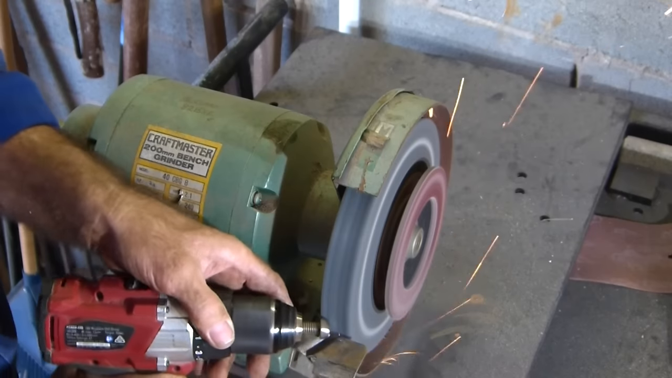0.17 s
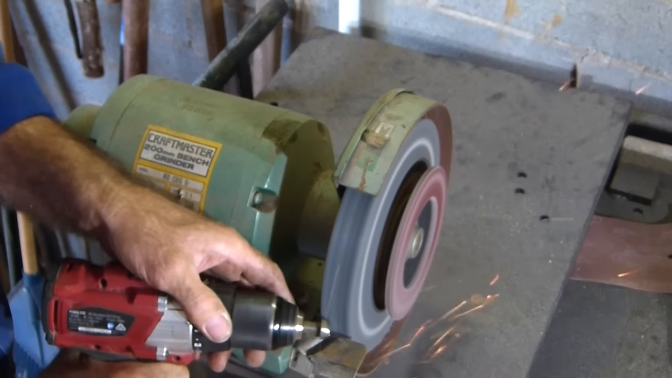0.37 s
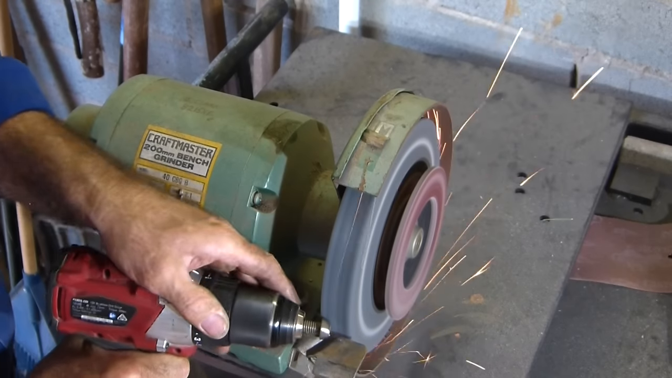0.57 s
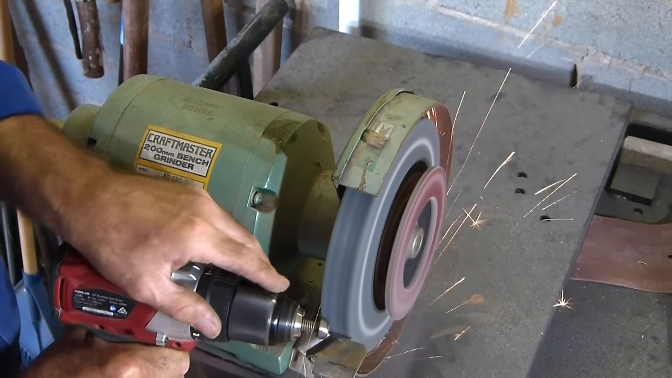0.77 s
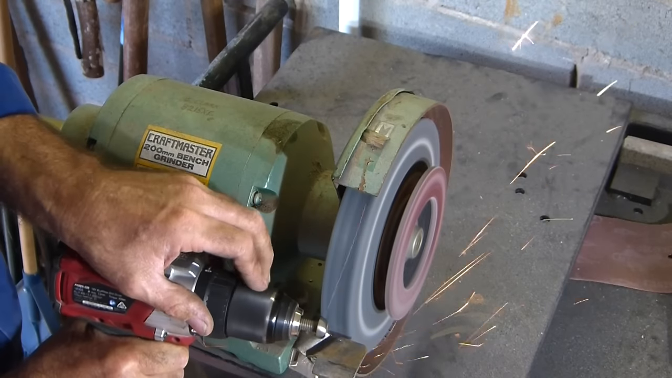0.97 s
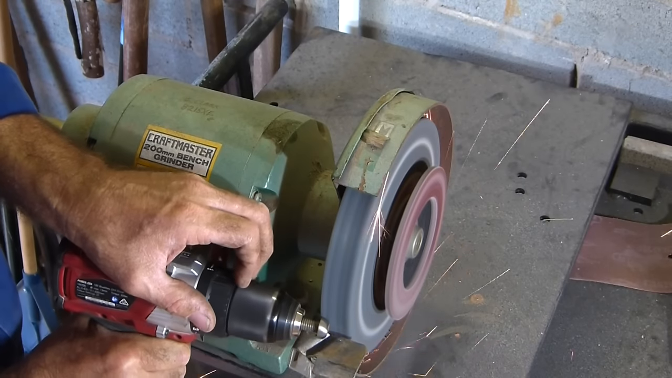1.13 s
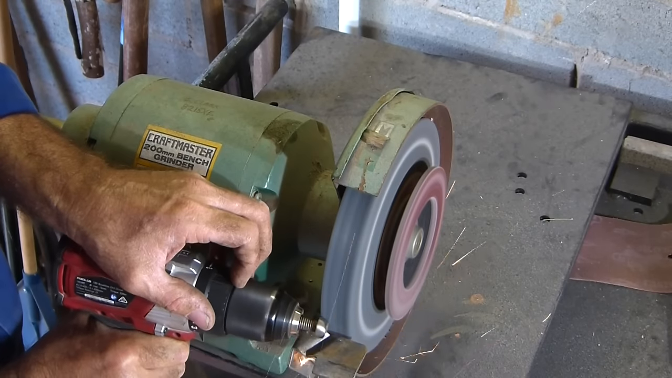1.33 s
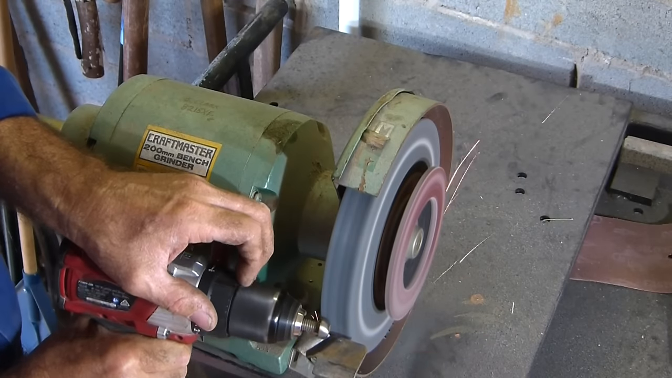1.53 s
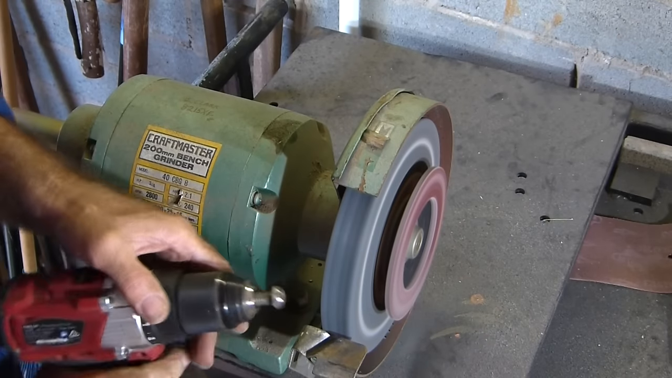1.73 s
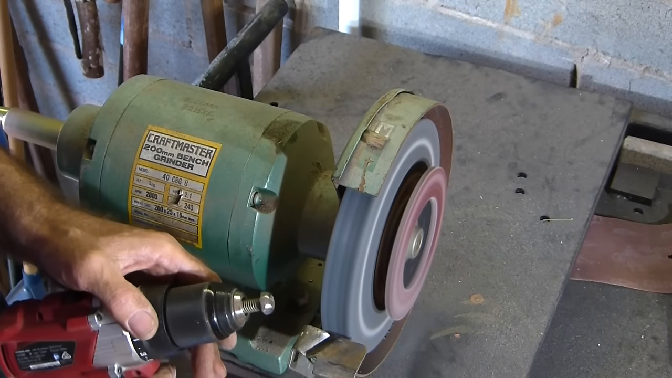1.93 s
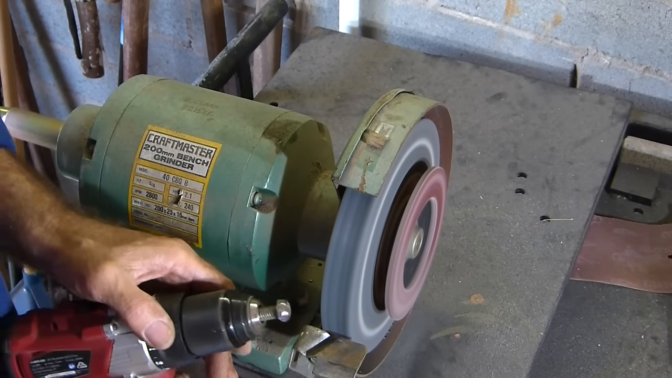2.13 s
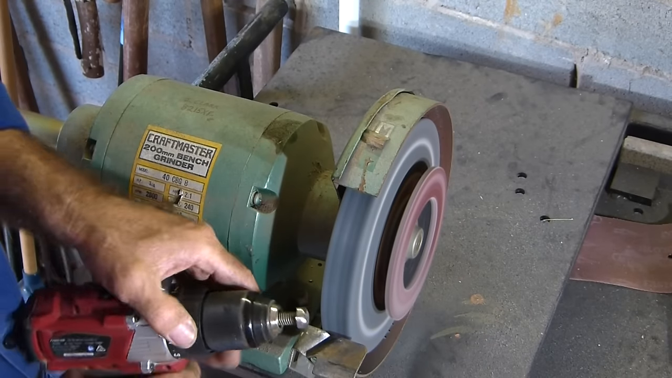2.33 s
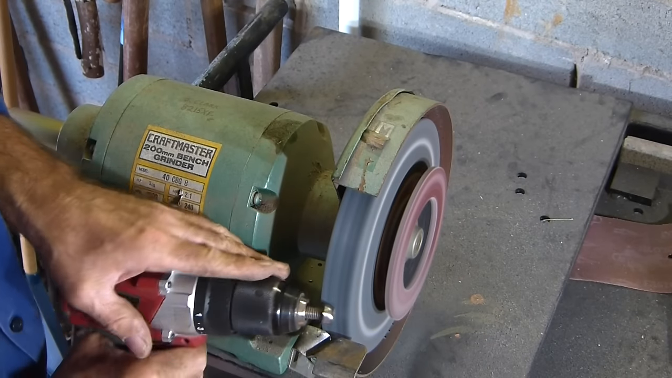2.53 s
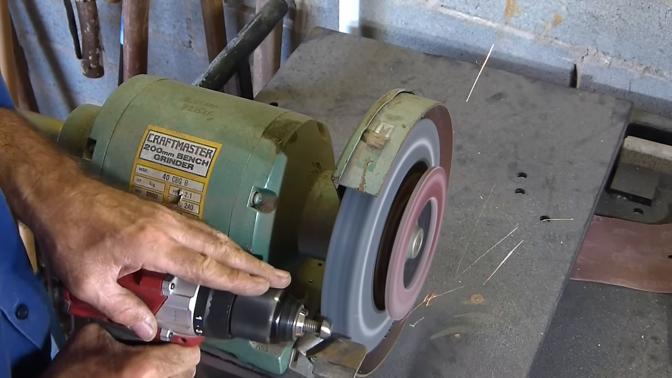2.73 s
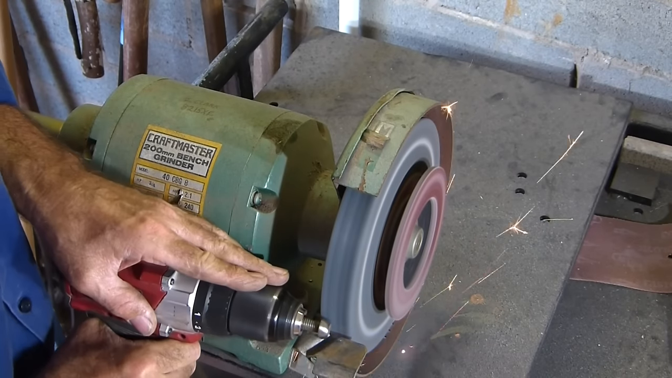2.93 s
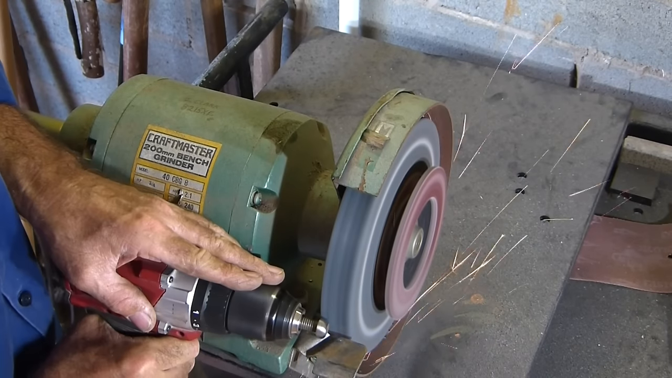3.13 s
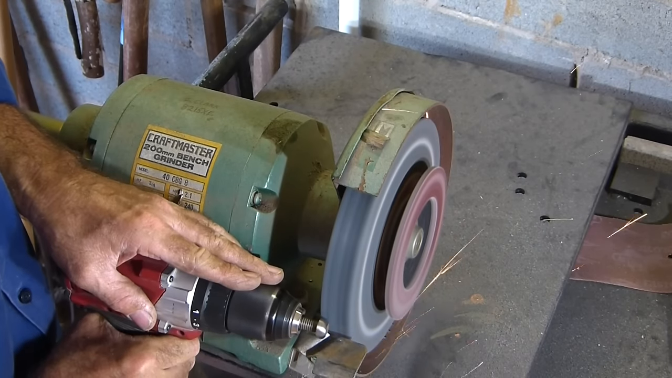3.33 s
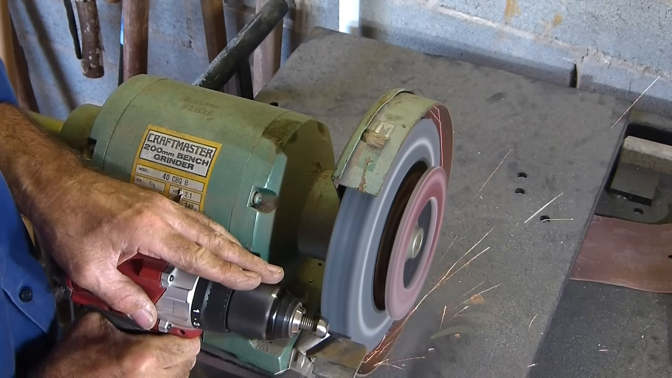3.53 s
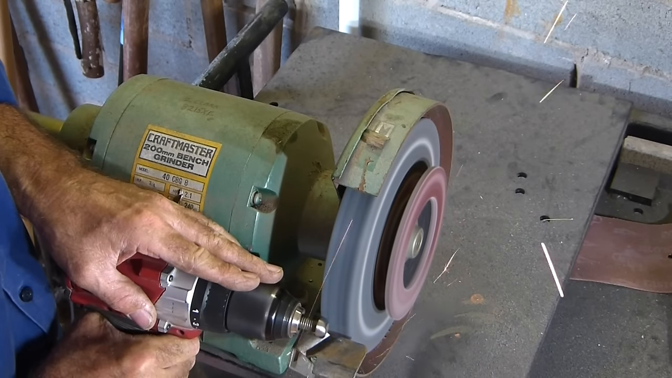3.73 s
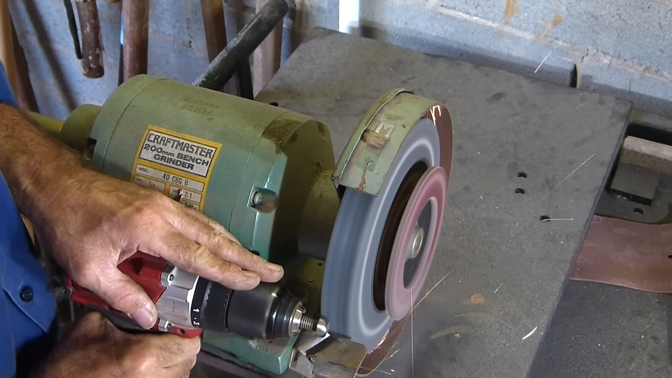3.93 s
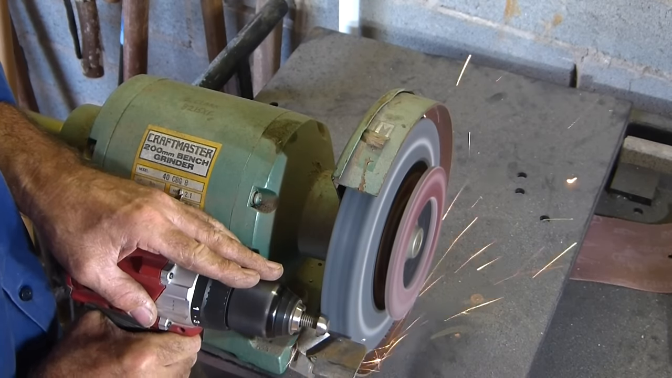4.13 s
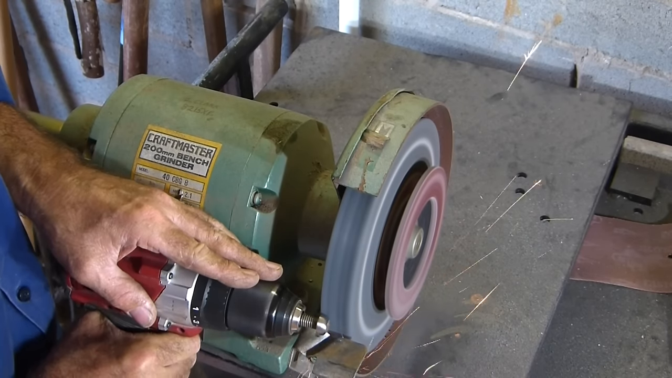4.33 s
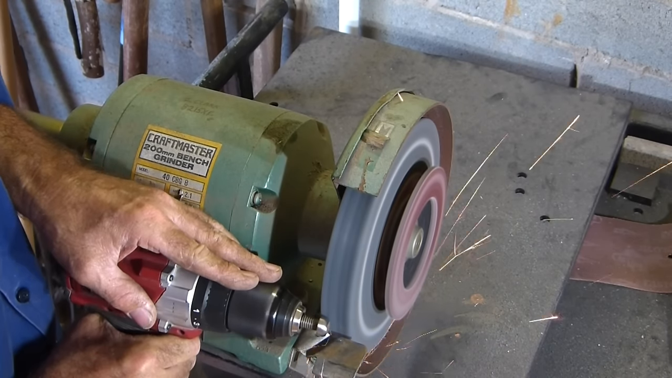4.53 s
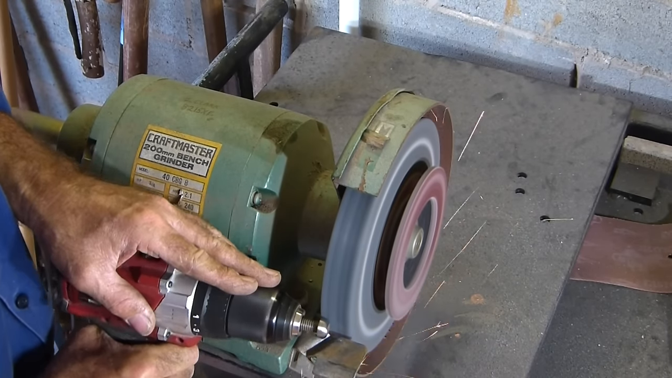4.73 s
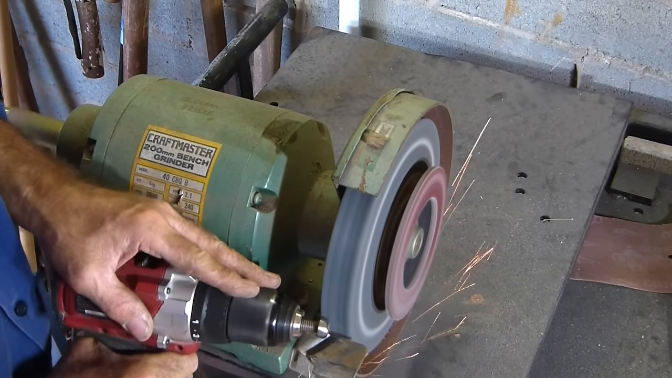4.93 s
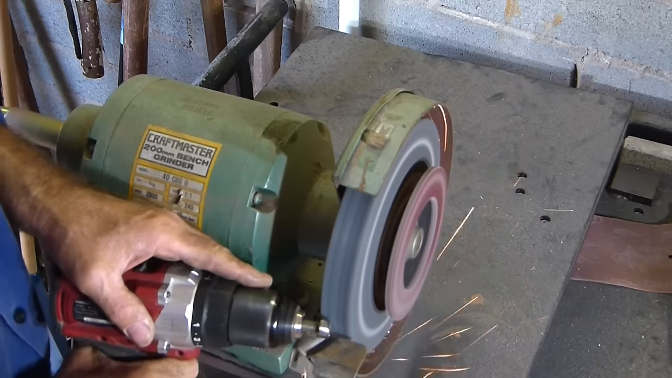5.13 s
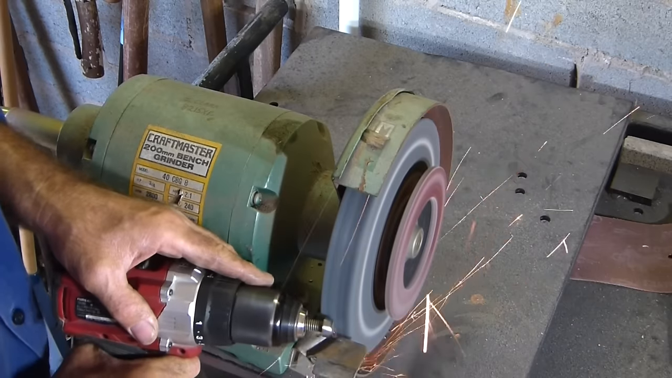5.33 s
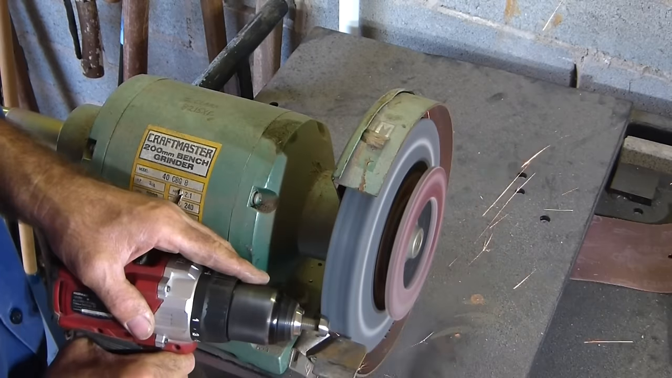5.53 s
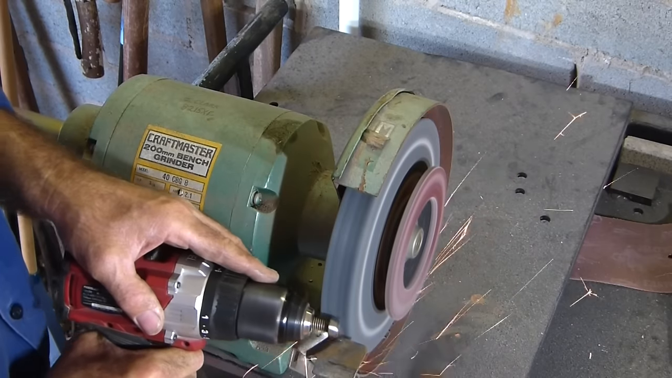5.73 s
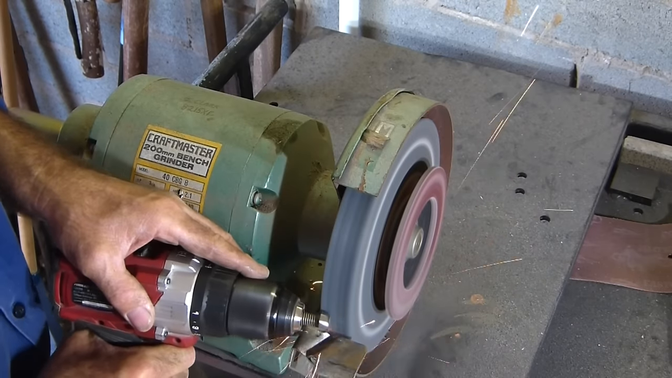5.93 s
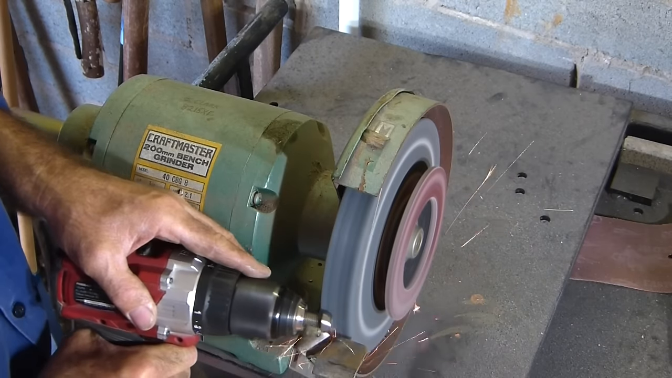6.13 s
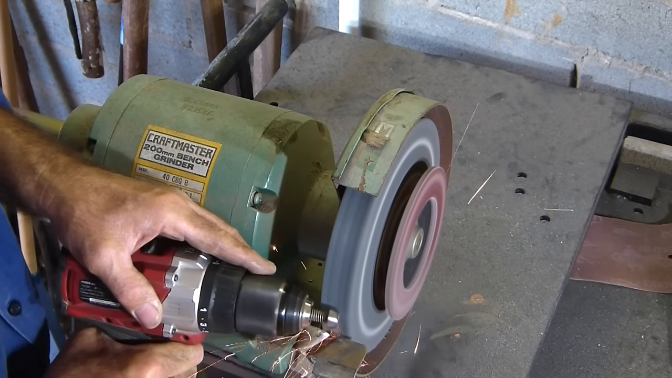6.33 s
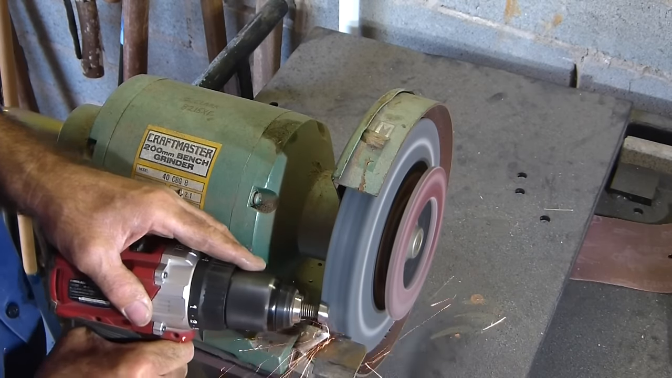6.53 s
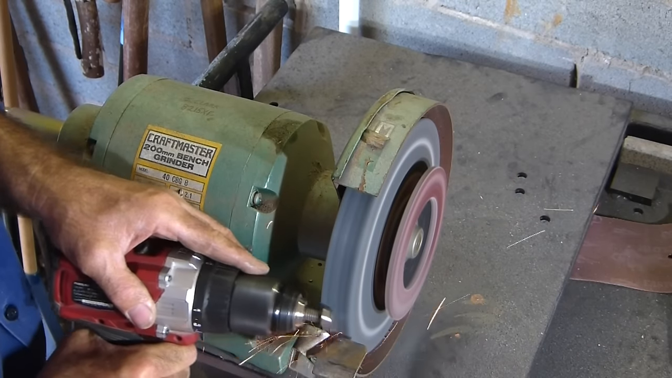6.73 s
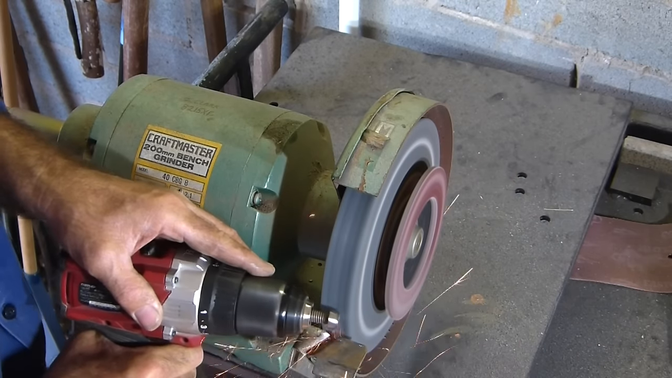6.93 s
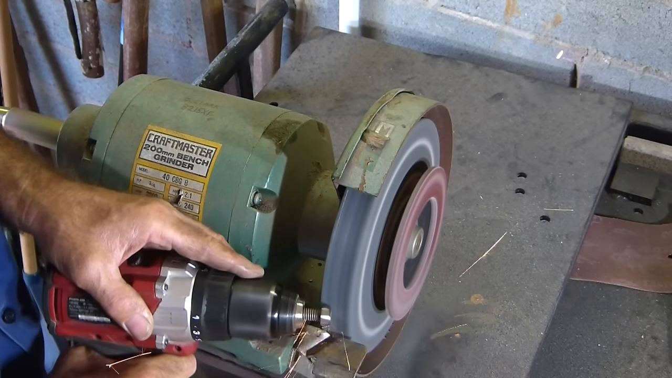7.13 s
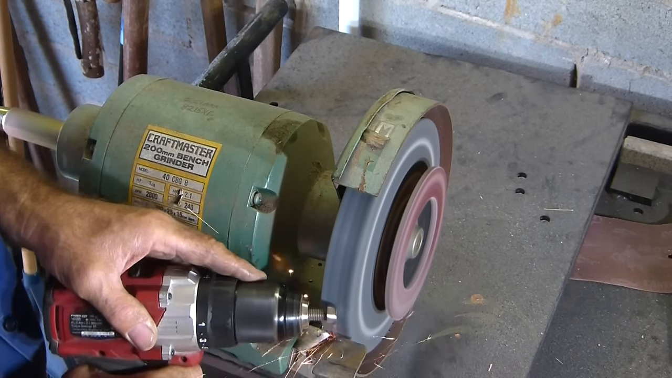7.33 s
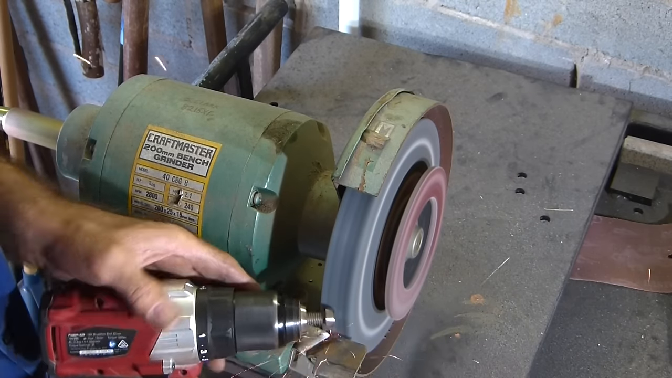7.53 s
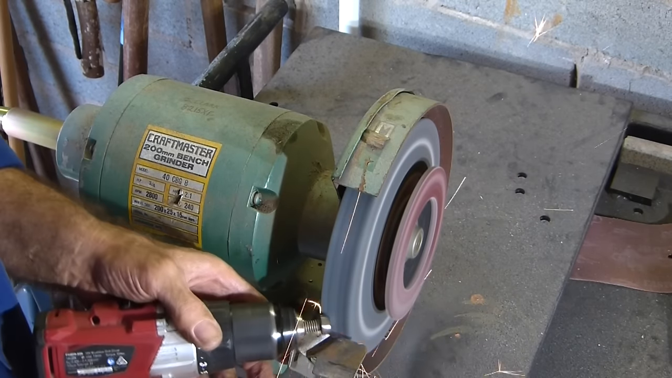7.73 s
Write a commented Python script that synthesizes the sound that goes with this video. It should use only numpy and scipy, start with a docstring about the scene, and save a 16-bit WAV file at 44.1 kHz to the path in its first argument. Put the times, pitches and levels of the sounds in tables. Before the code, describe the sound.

A bench grinder runs close by in a workshop, its motor giving a steady low rumble and hum throughout. From the start, a steel bolt spun in a cordless drill grinds on the wheel: a bright, gritty, fluttering hiss with very high metallic ringing, a light rattle and irregular sharp ticks. The drill's thin gear whine sits within it. At about 1.6 seconds the trigger clicks softly, the drill stops and the bolt lifts off, leaving only the motor and the airy whirr of the free wheel. Around 2.5 seconds comes a sharper click, then the drill's whine rises quickly to speed and the grinding resumes by 2.7 seconds. It continues evenly to the end, near 8 seconds, with ringing tones swelling and fading and scattered ticks and small pings as the steel catches the grit.

```python
"""Workshop: a steel bolt, spun in a cordless drill, is ground on a bench grinder, lifted off for a
second and put back. The grinder motor rumbles and hums throughout; the free wheel fans the air.
The trigger clicks, and the drill's gears whine while it is held. The grit hisses and sets bolt,
wheel and housing ringing; the six flats of the bolt make the contact flutter."""
import sys
import numpy as np
from scipy import signal
from scipy.fft import rfft, irfft, next_fast_len
from scipy.io import wavfile
from scipy.ndimage import uniform_filter1d

SR = 44100
rng = np.random.default_rng(int(sys.argv[2]) if len(sys.argv) > 2 else 0)


def dump(signal):
    """Clip the signal to [-1, 1] and save it as 16-bit WAV at the path in sys.argv[1]."""
    limited = np.clip(np.atleast_2d(signal).T, -1, 1)
    pcm = np.round(limited * 32767).astype(np.int16)
    wavfile.write(sys.argv[1], SR, pcm)


N = 347067
TIME_S = np.arange(N) / SR

WHEEL_HZ, FLATS_HZ, GEAR_MESH_HZ = 50.3, 124, 2619
HUM_HZ, DRONE_HZ = 99.5, 182
FULL_PRESSURE_HISS_DB = -43
SMALL_PINGS_FROM_S = 2.8

# Levels are relative; each source adds its own gain.
# stereo width of noise: f/Hz, side against mid/dB
STEREO_WIDTH = [(25, -23), (60, -29), (125, -51), (250, -42), (500, -21.5), (1000, -11), (2200, -19.5),
                (2700, -0.5), (4000, -15), (4800, -9.5), (7200, -4), (8000, -2), (9800, -5), (11000, 2),
                (12500, -1.5), (15000, -9)]

# grinder motor: t/s, rumble/dB, mains hum/dB, drone/dB
MOTOR_LEVELS = [(0.0, -54, -80, -69), (0.55, -50, -79, -55), (0.7, -50.5, -67, -56),
                (1.56, -47.5, -80, -55), (1.6, -54, -71, -55), (1.78, -55, -52, -60), (1.95, -58, -59, -65),
                (2.21, -55.5, -60, -65), (2.3, -57.5, -68, -57), (2.58, -49, -54.5, -46.5),
                (3.04, -48.5, -60.5, -61), (3.24, -47.5, -75, -57), (4.73, -49.5, -71, -51.5),
                (4.91, -48, -71, -58), (6.4, -51, -63, -53.5), (6.53, -52, -59, -51),
                (6.7, -49.5, -63, -58.5), (7.0, -51.5, -67, -61), (7.15, -47.5, -61, -50),
                (7.3, -50, -63, -61), (7.52, -50, -55, -56), (7.72, -52, -74, -63), (7.87, -53, -51, -54)]
# motor rumble: f/Hz, level/dB
RUMBLE_SPECTRUM = [(15, -62), (25, -27), (64, -46), (96, -10), (140, -12), (173, -8), (213, -11), (248, -3),
                   (310, -10.5), (366, 0), (517, -4), (591, -2.5), (900, -14.5), (1170, -43), (1980, -120)]
# motor casing: f/Hz, width/Hz, level/dB
CASING_MODES = [(299, 11, -68.5), (448, 59, -62), (501.5, 16, -64), (588.5, 25, -61.5), (1158, 44, -65),
                (1355, 74, -68)]
# air fanned by the free wheel: t/s, level/dB
AIR_LEVELS = [(1.6, -60), (1.646, -51), (1.682, -63), (2.15, -59), (2.526, -57), (2.574, -56), (2.66, -49)]
# fanned air: f/Hz, level/dB
AIR_SPECTRUM = [(440, -44), (750, -31), (931, -18), (1070, -5), (1150, -7), (1260, -5), (1350, -4.5),
                (1820, -10.5), (3810, -13.5), (4730, -16), (5720, -15), (8060, -21.5), (8810, -17),
                (14300, -26.5), (15600, -39)]
# bearing whirr: f/Hz, width/Hz, level against air/dB
BEARING_MODES = [(4650, 300, -12), (4900, 250, -15), (5400, 200, -20), (7190, 400, -17), (8750, 400, -16)]

# trigger clicks and first touches: t/s, level/dB
KNOCK_EVENTS = [(1.64, -26.5), (2.534, -15.5), (2.6014, -33), (2.6574, -22)]
# knock: f/Hz, level/dB
KNOCK_SPECTRUM = [(880, -52), (1500, -34), (3800, -6), (4310, -4), (5450, 1), (7520, -16), (9700, -4),
                  (15500, -28)]

# gears at full speed, one table a pass: t/s, level/dB
GEAR_LEVELS = [
    [(0.0, -78), (0.23, -51), (0.48, -48), (0.6, -49.5), (0.84, -67), (1.136, -65), (1.188, -55),
     (1.58, -47.5)],
    [(2.75, -43.5), (2.99, -47.5), (3.33, -51.5), (4.0, -48), (4.83, -51), (5.0, -56), (5.09, -66),
     (5.3, -50.5), (5.64, -56), (6.0, -51), (7.03, -48.5), (7.13, -44), (7.7, -47), (7.87, -59)],
]
# gears on trigger release: t/s, f/Hz, level/dB
GEAR_RUN_DOWN = [(1.626, 2547, -48.5), (1.66, 2550, -60)]
# gears on trigger pull: t/s, f/Hz, level/dB
GEAR_RUN_UP = [(2.645, 1754, -56), (2.656, 2054, -41), (2.669, 2307, -37), (2.682, 2459, -47),
               (2.703, 2577, -37.5), (2.72, 2600, -41)]
# thin whistle at drill start: t/s, f/Hz, level/dB
START_WHISTLE = [(2.605, 10350, -68), (2.62, 10650, -60), (2.64, 11000, -66)]
# gears taking up slack: t/s, f/Hz, level/dB
SLACK_SCRAPE = [(2.595, 2176, -58), (2.627, 2080, -44), (2.647, 2070, -48), (2.66, 2100, -37)]

# moves between four contact spots on the wheel: start/s, end/s
SPOT_MOVES = [(2.0, 2.1), (2.88, 3.04), (4.7, 5.04)]
# four clear wheel tones: f/Hz
CLEAR_TONES_HZ = [3355, 3528, 7283, 11391]
# one row a clear tone: width/Hz, pan/dB, left lead/rad, coherence/0-1
CLEAR_SHAPES = [(61.3, -2, -0.057, 0.83), (29.6, -4.5, -.12, 0.78), (26, -5.5, 1, 0.6),
                (22.5, 2.5, -0.64, 0.3)]
# one row a clear tone, one column a spot: resting level/dB
CLEAR_SPOT_DB = [(-49.5, -50, -44.5, -48.5), (-48.5, -50, -48, -50), (-48.5, -53, -46, -52),
                 (-55, -55, -45.5, -53)]
# contact catching a clear tone, one table a tone: t/s, level/dB
CLEAR_TONE_SWELLS = [
    [(1.2, -50), (1.312, -51), (1.432, -45), (1.57, -52), (2.56, -54), (3.0, -44), (3.1, -42), (3.29, -46),
     (3.65, -46), (4.09, -48), (4.59, -43), (5.62, -42), (5.75, -53), (6.17, -45), (6.57, -46), (6.65, -53),
     (7.14, -44.5), (7.48, -38), (7.66, -37), (7.75, -41)],
    [(0.2, -39), (0.486, -50), (0.85, -47), (1.17, -45), (1.504, -43), (3.29, -40.5), (3.39, -39),
     (3.65, -60), (3.92, -41), (4.07, -38), (4.17, -46), (4.29, -42), (4.46, -43), (4.65, -42), (4.92, -49),
     (5.57, -44), (5.93, -44), (6.05, -39.5), (6.86, -41), (7.54, -44), (7.66, -41)],
    [(0.0, -35.5), (0.2, -44), (0.742, -48), (1.098, -46), (1.57, -43), (2.57, -57), (2.83, -39),
     (2.97, -49), (3.1, -39), (3.28, -44), (3.37, -46), (3.61, -39), (3.7, -38), (3.9, -41), (4.07, -40),
     (4.17, -43), (4.28, -38.5), (4.55, -46), (4.92, -40), (5.07, -36.5), (5.62, -39), (6.25, -36.5),
     (6.57, -43), (6.86, -38), (7.14, -45), (7.67, -46)],
    [(0.742, -41), (0.902, -45), (1.0, -49), (1.208, -46), (1.32, -44), (1.59, -54), (1.64, -52),
     (2.83, -47), (2.99, -48), (3.1, -53), (3.26, -47), (3.32, -38), (3.51, -39), (3.8, -40), (4.07, -42),
     (4.17, -40), (4.49, -42), (4.69, -38), (4.92, -46), (5.63, -39)],
]
# six faint wheel tones: f/Hz
FAINT_TONES_HZ = [3929, 4250, 7003, 10754, 11771, 12050]
# one row a faint tone: width/Hz, pan/dB, left lead/rad, coherence/0-1
FAINT_SHAPES = [(30, .8, 1.2, 0.85), (45, -4, -2, 1), (32, 29, 3.5, 0.6), (95, -11, -0.6, .6),
                (40.6, -2, 1.6, 0.9), (330, -7, -0.5, 0.7)]
# one row a faint tone, one column a spot: resting level/dB
FAINT_SPOT_DB = [(-55.5, -61, -57, -50.5), (-54.5, -55, -59, -56.5), (-48, -49, -49.5, -57),
                 (-56, -59, -53, -63), (-48, -55, -42.5, -52.5), (-50, -43, -54, -47)]
# swells of the faint tones, one table a tone: t/s, level/dB
FAINT_TONE_SWELLS = [
    [],
    [],
    [(0.36, -38.5), (0.47, -37), (0.58, -45), (1.53, -46), (3.09, -53), (3.85, -47), (5.03, -47),
     (5.64, -40), (7.68, -43), (7.85, -43)],
    [(0.42, -45), (0.48, -48), (0.55, -49), (0.62, -45), (0.7, -42), (0.8, -49), (1.53, -51)],
    [],
    [],
]

# bolt on wheel, one table a pass: t/s, grit hiss/dB, bolt ring/dB, housing rattle/dB, rasp/dB
CONTACT_LEVELS = [
    [(0.0, -43.5, -35.5, -50, -33.5), (0.2, -44, -34, -47.5, -41), (0.45, -42.5, -35, -46.5, -40),
     (0.78, -45.5, -34.5, -43.5, -42), (1.0, -44, -36, -43.5, -59), (1.5, -44.5, -34, -44.5, -57),
     (1.59, -47.5, -42, -55, -55), (1.612, -53, -55, -60, -58), (1.639, -53, -47, -63, -61),
     (1.68, -75, -77, -73, -77)],
    [(2.53, -57, -71, -57, -50), (2.545, -51, -70, -57, -44), (2.575, -61, -70, -60, -56),
     (2.637, -56, -65, -57, -45), (2.659, -41.5, -62, -52, -47), (2.675, -48, -56, -50, -37),
     (2.685, -46, -39, -48, -41), (2.78, -44.5, -37, -47.5, -44), (2.87, -44, -30, -44.5, -42),
     (3.21, -43.5, -36.5, -45, -41), (3.52, -42.5, -35.5, -49.5, -50), (4.73, -43, -35, -49.5, -45),
     (4.89, -41.5, -35, -42.5, -48), (5.4, -43, -34.5, -44, -47), (5.54, -42, -35, -49, -54),
     (5.75, -43, -34.5, -49, -60), (6.1, -42.5, -34, -47, -53), (6.3, -42.5, -34, -51.5, -59),
     (7.1, -42.5, -36, -48, -46), (7.64, -42.5, -35, -51.5, -43), (7.8, -44, -36, -51, -37),
     (7.87, -41, -38.5, -48, -37)],
]
# housing rattle: f/Hz, level/dB
RATTLE_SPECTRUM = [(470, -28), (800, -9), (868, -17), (1120, -3), (1350, -3), (1790, -2.5), (2500, -21.5),
                   (3250, -38), (5500, -120)]
# housing: f/Hz, width/Hz, level against rattle/dB
HOUSING_MODES = [(983, 51, -15), (1188, 140, -17), (1346, 32, -10), (1702, 38, -18.5), (1820, 56, -10),
                 (2098, 54, -12)]
# grit hiss: f/Hz, level/dB
HISS_SPECTRUM = [(1000, -28.5), (1800, -18.5), (2500, -16.5), (3000, -13.5), (4200, -12.5), (5100, -10),
                 (6900, -12.5), (7600, -14), (8800, -11), (10500, -18), (11600, -10.5), (12500, -17.5),
                 (14500, -24), (15150, -32), (15700, -42)]
# broad modes under the grit: f/Hz, width/Hz, level/dB, pan/dB, left lead/rad, coherence/0-1
HISS_MODES = [(3405, 690, -3, -2, -3, 0), (6125, 420, -6.5, -1, 0.8, 0.7)]
# bolt ring: t/s, f/Hz
BOLT_PITCH = [(0.0, 9700), (0.9, 9850), (1.55, 9760), (2.7, 9740), (3.6, 9620), (5.0, 9530), (6.0, 9590),
              (7.87, 9660)]
# a bolt corner catches hard: t/s, level/dB
CORNER_BITES = [(0.182, -24), (0.5761, -20), (0.7145, -19), (0.7682, -17), (0.8515, -26), (0.8854, -26),
                (0.9901, -20), (1.039, -24), (1.2046, -19.5), (1.4854, -22), (1.5473, -27), (1.566, -30),
                (1.5908, -26), (2.5474, -28), (2.5531, -24.5), (2.6504, -22), (2.6579, -19), (2.6843, -19),
                (2.7013, -21), (2.7246, -22), (2.74, -26), (2.7454, -24), (2.7754, -25), (2.8786, -18),
                (2.9968, -21), (3.6693, -19.5), (4.1704, -18), (4.3878, -18), (4.9487, -18.5),
                (5.3796, -23), (5.7412, -19.5), (5.7495, -17.5), (6.3664, -17.5), (6.7575, -22),
                (6.8503, -19.5), (7.011, -23), (7.0344, -18), (7.29, -19), (7.4285, -19), (7.582, -18.5),
                (7.6212, -18.5), (7.6894, -19)]
# a grain tears loose and pings the bolt: t/s, level/dB
GRAIN_PINGS = [(3.2717, -36), (3.5893, -33), (3.6212, -31), (4.1316, -30), (4.4104, -33), (4.4494, -32),
               (4.7244, -31), (4.8479, -34.5), (5.08, -36), (5.1947, -27.5), (6.1876, -31), (6.4912, -30),
               (7.0498, -37), (7.088, -35), (7.4401, -34), (7.487, -36), (7.6017, -28)]


def amp(db):
    """dB to gain."""
    return 10 ** (np.asarray(db) / 20)


def unit_rms(x):
    """Scale to rms 1."""
    return x / np.sqrt(np.mean(np.abs(x) ** 2) + 1e-20)


def curves(*tables):
    """Columns of consecutive time tables, one value a sample."""
    times_s, *columns = np.transpose(np.concatenate(tables))
    return [np.interp(TIME_S, times_s, column) for column in columns]


def gate(*tables):
    """1 within each table's time span, else 0; 6 ms ramps."""
    inside = sum((TIME_S >= rows[0][0]) * (TIME_S <= rows[-1][0]) * 1. for rows in tables)
    return uniform_filter1d(inside, size=265)


def gain_at(spectrum, hz):
    """Gain from a dB table on a log-frequency axis."""
    points_hz, points_db = np.transpose(spectrum)
    return amp(np.interp(np.log(hz), np.log(points_hz), points_db))


def drift(corner_hz):
    """Random wander, rms 1: coarse noise through two one-pole low-passes."""
    pole = np.exp(-40 * np.pi * corner_hz / SR)
    slow = signal.lfilter([1], [1, -2 * pole, pole * pole], rng.standard_normal(N // 20 + 3002))[3000:]
    return np.interp(np.arange(N) / 20, np.arange(len(slow)), unit_rms(slow))


def wavering(levels_db, spreads_db, corner_hz):
    """Level curves, each with its own drift."""
    return [db + spread_db * drift(corner_hz) for db, spread_db in zip(levels_db, spreads_db)]


def noise(spectrum, drive=1):
    """Stereo noise, modulated by drive, then filtered; rms 1."""
    size = next_fast_len(N)
    hz = np.maximum(np.arange(size // 2 + 1) * SR / size, 1)
    mid, side = rfft(drive * rng.standard_normal((2, N)), size) * gain_at(spectrum, hz)
    ears = mid + gain_at(STEREO_WIDTH, hz) * side * [[1], [-1]]
    return unit_rms(irfft(ears, size)[:, :N])


def mode(hz, width_hz, pan_db=0, lead_rad=0, coherence=1, drive=1, even=0.):
    """Noise-fed stereo resonance, rms 1: a slow envelope on a carrier; even (0-1) steadies it."""
    pole = np.exp(-4 * np.pi * width_hz / SR)
    coarse_drive = np.broadcast_to(drive, N)[::4]   # envelope runs at SR / 4
    swing = coarse_drive * rng.standard_normal((4, len(coarse_drive)))
    for _ in range(2):
        swing = signal.lfilter([1 - pole], [1, -pole], swing)
    swing = swing[:2] + 1j * swing[2:]
    mid, side = swing / (np.abs(swing) + 1e-6) ** even
    left_right = np.array([[1], [-1]])
    ears = np.sqrt(1 + coherence) * mid + np.sqrt(1 - coherence) * side * left_right
    ears = ears * np.exp(.5j * lead_rad * left_right) * amp(pan_db / 2 * left_right)
    ears = np.array([np.interp(np.arange(N) / 4, np.arange(len(ear)), ear) for ear in ears])
    carrier = np.exp(2j * np.pi * np.cumsum(np.broadcast_to(hz, N)) / SR)
    return unit_rms(np.real(ears * carrier))


def impulses(events):
    """Click train from rows of t/s, level/dB."""
    clicks = np.zeros(N)
    for s, db in events:
        clicks[round(s * SR)] = amp(db)
    return clicks


def random_impulses(per_s, db, spread_db):
    """Clicks of random time and strength."""
    return (rng.random(N) < per_s / SR) * amp(db + spread_db * rng.standard_normal(N))


def struck(clicks, rise_s, fall_s):
    """Envelope of blows: quick rise, short ring."""
    t = TIME_S[:882]
    shape = (1 - np.exp(-t / rise_s)) ** 2 * np.exp(-t / fall_s)
    return signal.oaconvolve(clicks, shape / shape.max())[:N]


def grinder():
    """Motor rumble, hum and casing tones; fanned air and bearing whirr while the wheel runs free."""
    rumble_db, hum_db, drone_db = wavering(curves(MOTOR_LEVELS), spreads_db=(1, 2, 2.5), corner_hz=3.2)
    casing = sum(amp(db) * mode(hz, width_hz) for hz, width_hz, db in CASING_MODES)
    whirr = sum(amp(db) * mode(hz, width_hz, coherence=.62) for hz, width_hz, db in BEARING_MODES)
    hum = amp(hum_db - 5.5) * mode(HUM_HZ, 5.9, even=.75)
    drone = amp(drone_db - 6) * mode(DRONE_HZ, 42, even=.7)
    free_running = amp(curves(AIR_LEVELS)[0] + 1.5) * gate(AIR_LEVELS)
    air = noise(AIR_SPECTRUM, drive=amp(.53 * drift(24)))
    bench = amp(.9 * hum_db - 21) * mode(55, 50, coherence=.99)   # shakes with the hum
    rumble = amp(rumble_db - 1) * noise(RUMBLE_SPECTRUM)
    return rumble + casing + hum + drone + bench + free_running * (air + whirr)


def knocks(decay_db_per_s=1130):
    """Trigger clicks and first touches: fast-dying noise bursts."""
    envelope = sum(amp(db - 13 - decay_db_per_s * np.maximum(TIME_S - s, 0)) * (TIME_S >= s)
                   for s, db in KNOCK_EVENTS)
    return envelope * noise(KNOCK_SPECTRUM)


def drill():
    """Gear whine, sliding and rough off full speed; whistle and scrape on restart."""
    first, second = ([(s, GEAR_MESH_HZ, db) for s, db in rows] for rows in GEAR_LEVELS)
    runs = first + GEAR_RUN_DOWN, GEAR_RUN_UP + second
    mesh_hz, mesh_db = curves(*runs)
    backlash = np.clip(1 - mesh_hz / GEAR_MESH_HZ, 0, .15)   # gears knock until the speed settles
    rough_db = (1.3 + 16 * backlash) * drift(150)
    whine_hz = mesh_hz + 2.99 * drift(6.02)
    whine = amp(mesh_db + 3 + rough_db) * mode(whine_hz, 14.5, .47, 1.43, .97, even=1)
    whistle_hz, whistle_db = curves(START_WHISTLE)
    whistle = amp(whistle_db) * mode(whistle_hz, 30, coherence=.7, even=.8)
    scrape_hz, scrape_db = curves(SLACK_SCRAPE)
    scrape = amp(scrape_db) * mode(scrape_hz, 900, coherence=.91, drive=amp(5.5 * drift(150)))
    return gate(*runs) * whine + gate(SLACK_SCRAPE) * scrape + gate(START_WHISTLE) * whistle


def wheel_envelope(pressure, spot_db, wander_db, swells, width_hz):
    """Wheel mode level: rises with the contact at once; the narrower the mode, the slower it fades."""
    resting_db = np.interp(TIME_S, np.ravel(SPOT_MOVES), np.repeat(spot_db, 2)[1:-1])
    bell = np.exp(-.5 * (np.arange(-6000, 6001) / SR / .028) ** 2)   # sigma 28 ms
    swelling = signal.oaconvolve(impulses(swells), bell, "same")
    drive = np.hypot(pressure * amp(resting_db + wander_db), swelling)
    fade_db = 9 * width_hz * TIME_S   # 9 dB/s per Hz of width
    return amp(np.maximum.accumulate(20 * np.log10(drive + 1e-9) + fade_db) - fade_db)


def wheel_tones():
    """Narrow modes of wheel and guard, fed by the contact, ringing briefly after lift-off."""
    hiss_db = curves(*CONTACT_LEVELS)[0]
    pressure = gate(*CONTACT_LEVELS) * np.minimum(amp(hiss_db - FULL_PRESSURE_HISS_DB), 1)
    flutter = amp(2.1 * drift(41))
    tones = np.zeros((2, N))
    for hz, shape, spot_db, swells in zip(CLEAR_TONES_HZ, CLEAR_SHAPES, CLEAR_SPOT_DB, CLEAR_TONE_SWELLS):
        envelope = wheel_envelope(pressure, spot_db, 2 * drift(8.9), swells, width_hz=shape[0])
        tones += envelope * amp(2.74 * drift(79)) * mode(hz, *shape, even=.9)
    for hz, shape, spot_db, swells in zip(FAINT_TONES_HZ, FAINT_SHAPES, FAINT_SPOT_DB, FAINT_TONE_SWELLS):
        envelope = wheel_envelope(pressure, spot_db, 1.25 * drift(2.3), swells, width_hz=shape[0])
        tones += envelope * mode(hz, *shape, drive=flutter)
    return tones


def housing_rattle(unsteady):
    """The contact shakes the housing: uneven noise plus its modes."""
    ring = sum(amp(db) * mode(hz, width_hz, -.2, .05, .93) for hz, width_hz, db in HOUSING_MODES)
    return noise(RATTLE_SPECTRUM, drive=amp(1.56 * unsteady)) + ring


def grain_pings():
    """Grains tear loose and ping the bolt."""
    small = (TIME_S > SMALL_PINGS_FROM_S) * random_impulses(per_s=22, db=-38, spread_db=1.8)
    envelope = struck(impulses(GRAIN_PINGS) + small, rise_s=.0009, fall_s=.0064)
    return amp(-6.5) * envelope * mode(5150, 770, 1.4, .1, .96, even=.36)


def corner_bites(pressing, ring_hz):
    """Corners catch on the wheel and strike the bolt's ring."""
    small = pressing * random_impulses(per_s=7, db=-27, spread_db=2.5)
    envelope = struck(impulses(CORNER_BITES) + small, rise_s=.00054, fall_s=.0024)
    return amp(-6.5) * envelope * mode(ring_hz, 112, .3, -.2, .85, even=.93)


def grit_hiss(grit):
    """Grit on steel: noise over broad modes; small grains keep a stiff bolt mode astir."""
    grains = amp(3 * drift(120))
    broad = sum(amp(db) * mode(hz, width_hz, *stereo, drive=grit)
                for hz, width_hz, db, *stereo in HISS_MODES)
    stiff = amp(-9) * mode(5120, 820, 1.4, .1, .97, drive=grains)
    return amp(5) * noise(HISS_SPECTRUM, drive=grit) + broad + stiff


def grinding():
    """Bolt on wheel under a wavering hand: each corner bites, each flat lets go."""
    touching = gate(*CONTACT_LEVELS)
    hiss_db, ring_db, rattle_db, rasp_db = wavering(
        curves(*CONTACT_LEVELS), spreads_db=(.6, .9, 1.4, 2), corner_hz=5.2)
    pressing = touching * (hiss_db > FULL_PRESSURE_HISS_DB - 6)
    flats_hz = FLATS_HZ * (1 + .1 * drift(2.1))
    ring_hz = curves(BOLT_PITCH)[0] + 30 * drift(2)
    flats = np.cos(2 * np.pi * np.cumsum(flats_hz * (1 + .0355 * drift(7.6))) / SR)
    runout = np.cos(2 * np.pi * WHEEL_HZ * TIME_S)   # wheel slightly out of true
    unsteady = drift(28)
    grit = amp(.79 * flats + .72 * runout + .65 * unsteady + 2.05 * drift(370))
    bite = amp(3.9 * flats + .5 * runout + .13 * unsteady + .38 * drift(62))
    hiss = amp(hiss_db) * grit_hiss(grit)
    rasp = amp(rasp_db - 9) * mode(3730, 380, -.5, .1, .95, drive=grit)
    ring = amp(ring_db - 1) * mode(ring_hz, 496, .53, -.2, .77, drive=bite)
    strikes = corner_bites(pressing, ring_hz) + grain_pings()
    rattle = amp(rattle_db - 3.5) * housing_rattle(unsteady)
    return touching * (hiss + rasp + ring + rattle) + strikes


def scene():
    """All sources, close up."""
    return grinding() + wheel_tones() + drill() + knocks() + grinder()


def record(dry, low_hz=45, high_hz=15760):
    """Cut the deepest bass and the top."""
    dry = signal.sosfilt(signal.butter(2, low_hz, "high", fs=SR, output="sos"), dry)
    return signal.sosfilt(signal.cheby2(26, 60, high_hz, fs=SR, output="sos"), dry)


dry = scene()
out = record(dry)
dump(out)
```